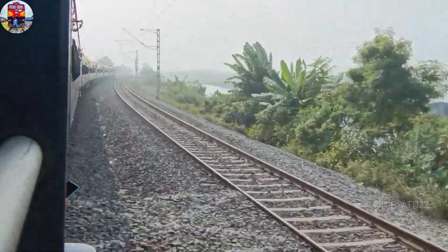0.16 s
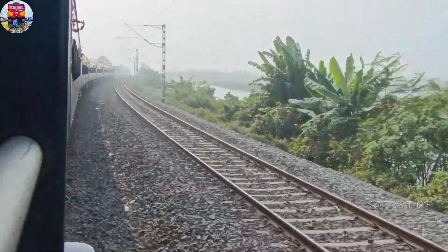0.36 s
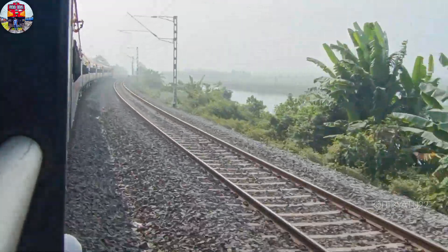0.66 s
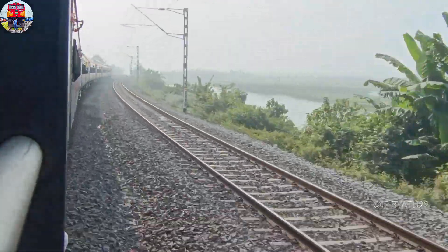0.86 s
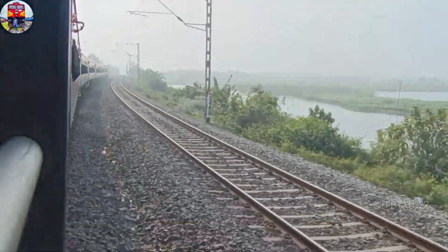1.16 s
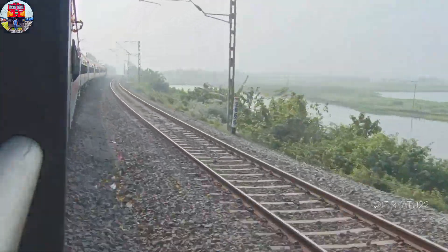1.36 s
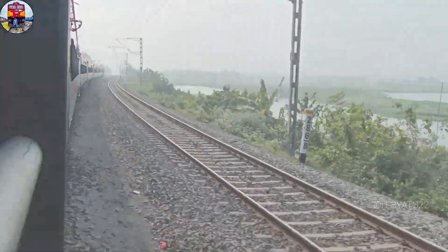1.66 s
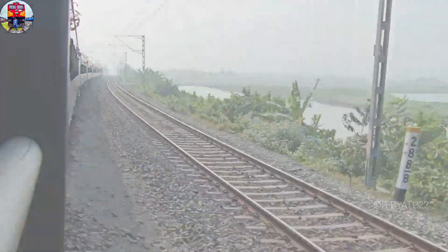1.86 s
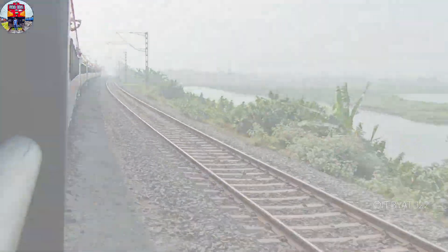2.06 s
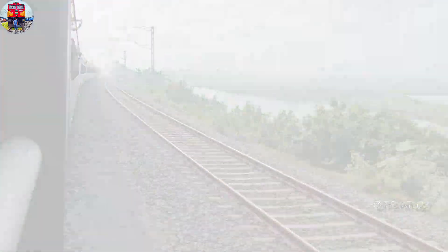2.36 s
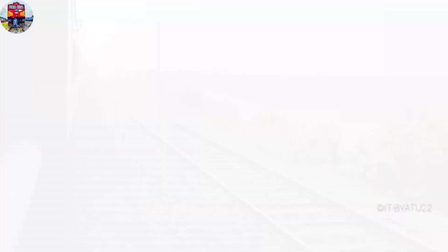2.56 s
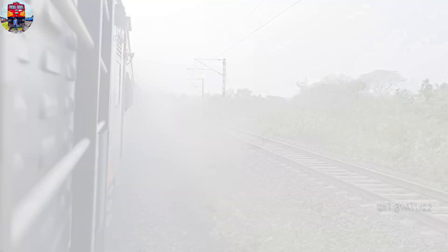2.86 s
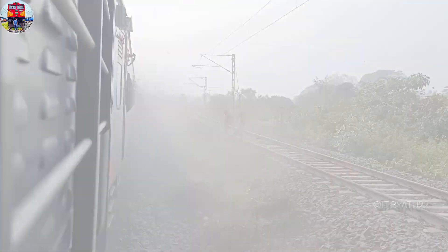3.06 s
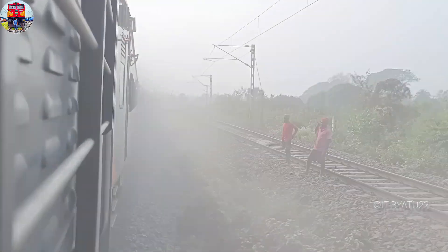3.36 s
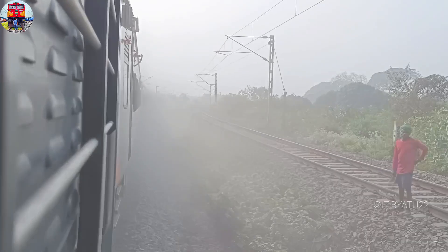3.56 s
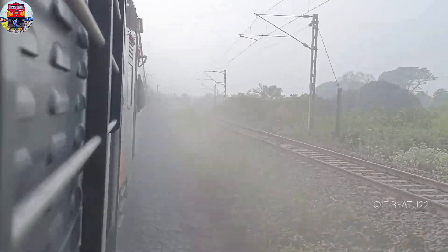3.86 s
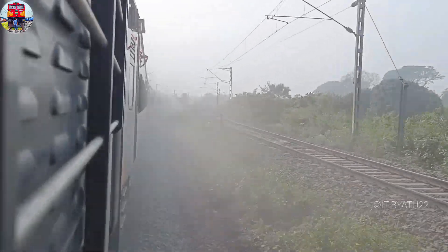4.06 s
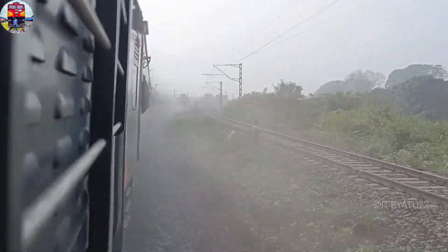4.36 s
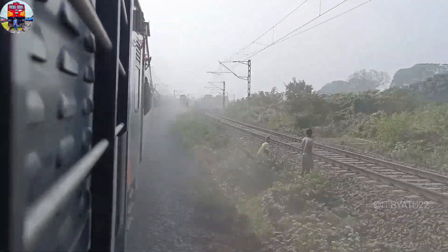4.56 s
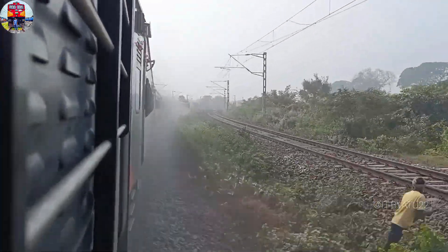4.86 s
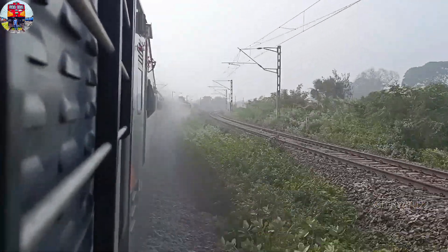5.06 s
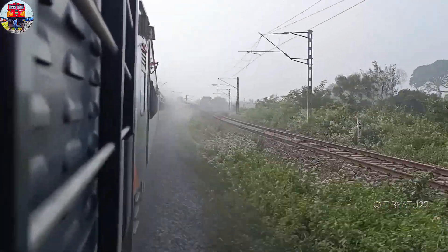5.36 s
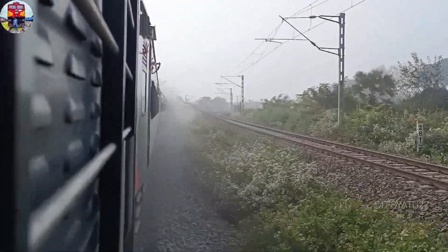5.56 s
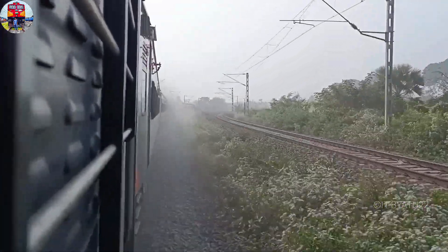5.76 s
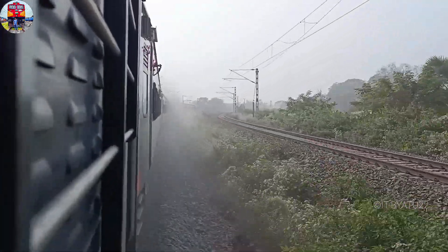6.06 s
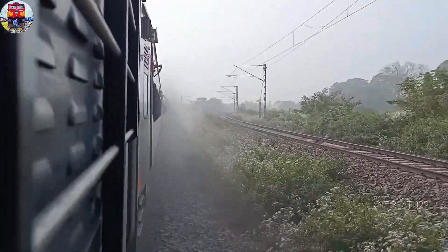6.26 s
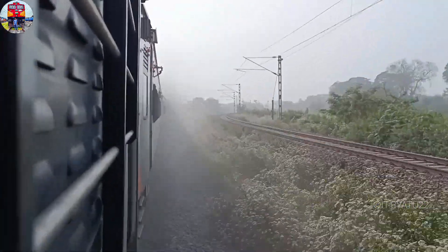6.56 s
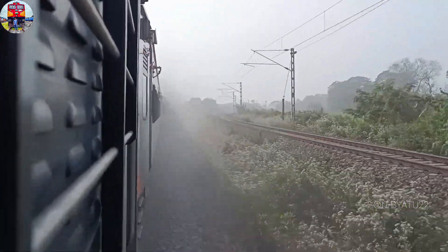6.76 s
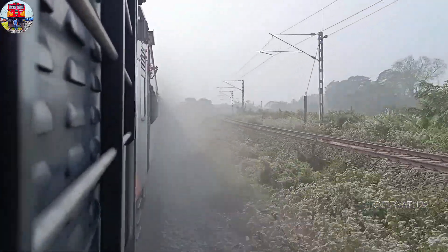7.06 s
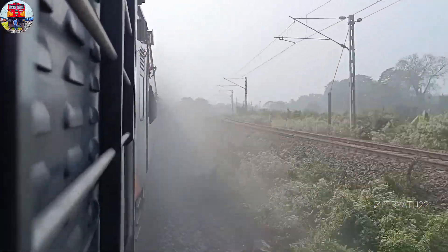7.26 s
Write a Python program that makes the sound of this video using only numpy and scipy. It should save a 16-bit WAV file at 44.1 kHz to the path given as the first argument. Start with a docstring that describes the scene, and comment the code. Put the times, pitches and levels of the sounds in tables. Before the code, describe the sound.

Harsh headwind batters a microphone at a speeding train's door over rolling roar and grit ticks, dipping to silence once between two passages.

```python
"""At the open door of a fast train, in two passages joined by a fade through silence.
Turbulent headwind buffets two microphone ports separately, as noise with gusts, lulls and hissing puffs.
Wheels and rails roar mostly into the sheltered left port, as patchy noise; in the second passage narrow
resonances ring and a throb follows the wheel turns. Grit ticks, as short noise bursts; the end of a horn
blast, a sum of overtones, opens the scene. The loud peaks clip."""
import sys
import numpy as np
from scipy import signal
from scipy.fft import rfft, irfft, next_fast_len
from scipy.io import wavfile
from scipy.ndimage import uniform_filter1d

SR = 44100
rng = np.random.default_rng(int(sys.argv[2]) if len(sys.argv) > 2 else 0)


def store_wav(level_fs):
    """Save 16-bit WAV to argv[1]."""
    pcm = np.round(np.clip(np.atleast_2d(level_fs), -1, 1) * 32767)
    wavfile.write(sys.argv[1], SR, pcm.T.astype(np.int16))


N = 326781
T = np.arange(N) / SR
JOIN_S = 2.633  # where the second passage follows the first


def gain_of(db):
    """Logarithmic level: decibels to an amplitude ratio."""
    return 10 ** (np.asarray(db) / 20)


def evened(x):
    """Normalisation of power: scales to rms 1."""
    return x / np.sqrt(np.mean(x ** 2) + 1e-20)


def read(points, x):
    """Logarithmic frequency scale: interpolates a table on a log axis."""
    hz, value = np.transpose(points)
    return np.interp(np.log(x + 1), np.log(hz + 1), value)


def colour(x, points):
    """Linear filtering: multiplies the spectrum by a table of gains in dB."""
    size = next_fast_len(len(x))
    gain = gain_of(read(points, np.fft.rfftfreq(size, 1 / SR)))
    return irfft(rfft(x, size) * gain, size)[:len(x)]


def wobble(hz):
    """Low-passed random process: smooth chance of rms 1 that changes about hz times a second."""
    width = max(int(SR / hz / 2), 1)
    smooth = uniform_filter1d(rng.standard_normal(N), width)
    return evened(uniform_filter1d(smooth, width))


def bumps(rows):
    """Superposition of level envelopes: flat-topped dB bumps, each centred on its time."""
    out = np.zeros(N)
    for s, db, length in rows:
        near = slice(max(int((s - length) * SR), 0), max(int((s + length) * SR), 0))
        out[near] += db * np.exp(-(2 * (T[near] - s) / length) ** 4)
    return out


def field(gain, patchy_db):
    """Short-time spectral synthesis: noise of spectrum gain(Hz) with drifting patches of level."""
    frames, hz = N // 256 + 5, np.fft.rfftfreq(1024, 1 / SR)
    real, imaginary, patches = rng.standard_normal((frames, 513, 3)).T
    patches = uniform_filter1d(patches, size=8, axis=0)  # over frequency
    patches = evened(uniform_filter1d(patches, size=10, axis=1))  # over time
    spectra = (real + 1j * imaginary) * gain(hz)[:, None] * gain_of(patchy_db * patches)
    return evened(signal.istft(spectra, nperseg=1024, noverlap=768)[1][:N])


# overtones of the horn: (multiple of the fundamental [1], rms level on the left [dB])
HORN_OVERTONES = [(3, -19), (6, -31), (7, -20), (8, -30), (9, -30), (10, -31), (11, -32)]
HORN_HZ, HORN_END_S = 237.3, 0.11


def horn():
    """Harmonic series: the last moment of a horn blast, slightly unsteady, stopping short."""
    turns = np.cumsum(HORN_HZ * (1 + 0.0054 * wobble(hz=30))) / SR
    tone = 0
    for multiple, db in HORN_OVERTONES:
        phase = 2 * np.pi * (multiple * turns + rng.random())
        tone = tone + gain_of(db) * np.sqrt(2) * np.sin(phase)
    stop = 1 + np.exp(np.clip((T - HORN_END_S) / 0.009, -50, 50))
    return tone / stop * gain_of([[0], [-14.]])  # left, right


# large ticks of grit thrown against the car:
# (time [s], level before the burst shape [dB], left minus right [dB])
LARGE_TICKS = [(0.0574, -14.5, 19), (0.857, -18, 8), (1.2256, -20, 10), (1.4678, -13.5, 12), (1.54, -19, 4),
               (1.585, -18, 9.5), (1.7154, -23, 14), (1.8244, -22, 14.0), (1.961, -15, 8),
               (3.5014, -29, 1.5), (3.5917, -28, 1.0), (3.669, -20, 2), (4.19, -19, 3), (5.2305, -23, -12),
               (5.391, -21, 6), (5.68, -21, -4), (5.882, -23, -14)]
# colour of a tick: (frequency [Hz], relative level per Hz [dB])
TICK_COLOUR = [(800, -11), (2500, 0.5), (6000, -3.5), (10000, -20.5), (16000, -34)]
GRIT_PER_S, GRIT_LEAST_DB = 25, -42  # the many small ticks: mean rate, lowest level before panning


def grit():
    """Impact noise: millisecond bursts of bright noise, large ticks and small ones at random."""
    size_db = GRIT_LEAST_DB + 4 * np.minimum(rng.exponential(1, N), 3)
    size = gain_of(size_db) * (rng.random(N) < GRIT_PER_S / SR)
    halves = np.array([.5, -.5])  # a level difference splits evenly between the ports
    hits = size * gain_of(12.0 * rng.standard_normal(N) * halves[:, None])
    for s, db, pan_db in LARGE_TICKS:
        hits[:, round(s * SR)] += gain_of(db + halves * pan_db)
    t = np.arange(SR // 40) / SR
    snap = np.exp(-t / 0.0015) - np.exp(-t / 0.00017)
    rattle = 0.091 * np.exp(-t / .006)
    shape = signal.oaconvolve(hits, (snap + rattle)[None])[:, :N]
    return shape * [evened(colour(rng.standard_normal(N), TICK_COLOUR)) for port in hits]


WHEEL_TURNS_PER_S, WHEEL_TOP_S = 10.22, 5.234  # wheel turns, and a moment when the throb peaks


def throb(depth_db):
    """Periodic load modulation: a wheel not quite round loads the rail more once per turn."""
    return gain_of(depth_db * np.cos(2 * np.pi * WHEEL_TURNS_PER_S * (T - WHEEL_TOP_S)))


# resonances of wheel and rail: (frequency [Hz], width [Hz], relative share of power [dB])
RESONANCES = [(287, 14, -15), (755, 14, -21), (895, 25, -19), (935, 16, -18), (1489, 16, -24),
              (1735, 60, -15), (1790, 34, -10.5), (1850, 60, -18), (2337, 18, -20)]


def rings():
    """Resonance: noise in the narrow modes of wheel and rail, wavering in strength."""
    size = next_fast_len(N)
    hz = np.fft.rfftfreq(size, 1 / SR)
    power = np.zeros(len(hz))
    for f, width, db in RESONANCES:
        power += gain_of(2 * db) / width / (1 + (2 * (hz - f) / width) ** 2) ** 2
    ringing = irfft(rfft(rng.standard_normal(size)) * np.sqrt(power), size)[:N]
    return evened(ringing) * gain_of(1.6 * wobble(hz=25))


# rolling roar in the first and second passage: (frequency [Hz], relative level per Hz [dB])
FIRST_ROAR = [(60, -43), (150, -1.5), (300, 0), (850, 0.5), (1400, -6.5), (1950, 3), (2300, -1.5),
              (2850, -6.5), (4200, -11.5), (5600, -21), (7000, -33.5), (10000, -50), (16000, -64)]
SECOND_ROAR = [(60, -38.5), (150, 2), (300, -6), (550, -0.5), (920, 4.5), (1350, -7.5), (1900, 1.5),
               (2950, 0), (3800, -14), (6500, -30), (9000, -34.5), (11000, -53), (16000, -53)]
RING_THROB_DB, ROAR_THROB_DB = 3.5, 0.56  # depth of the throb, up and down


def roar():
    """Broadband contact noise: plain roar before the join, throbbing and ringing roar after it."""
    first = field(lambda hz: gain_of(read(FIRST_ROAR, hz)), patchy_db=1.5)
    second = field(lambda hz: gain_of(read(SECOND_ROAR, hz)), patchy_db=1.05)
    ringing = gain_of(-6.0) * rings() * throb(RING_THROB_DB)
    return np.where(T < JOIN_S, first, second * throb(ROAR_THROB_DB) + ringing)


# roar swelling about once a second with track and surroundings: (time [s], level [dB])
ROLLING_LEVEL = [(0.0, -7.5), (0.16, -13.5), (0.19, -20.5), (0.3, -14.5), (0.4, -13.5), (0.47, -9),
                 (0.78, -7.5), (0.9, -16.5), (1.08, -11), (1.17, -8.5), (1.3, -16.5), (1.62, -7),
                 (1.8, -8.5), (1.9, -10.5), (2.25, -13), (2.52, -11), (2.755, -17), (2.775, -12.5),
                 (2.88, -14.5), (3.05, -12.5), (3.42, -20.5), (3.7, -14), (4.16, -9.5), (4.23, -13.5),
                 (4.41, -21.5), (4.6, -16.5), (4.77, -19.5), (5.04, -13.5), (5.13, -17.5), (5.31, -13),
                 (5.4, -18.5), (6.03, -12), (6.42, -10.5), (6.55, -12), (6.61, -20), (6.68, -17.5),
                 (6.75, -16), (6.9, -16), (7.15, -10), (7.31, -7.5), (7.35, -15.5), (7.41, -14)]
# how much of the roar reaches the right port: (frequency [Hz], gain [dB])
RIGHT_SHADE = [(200, -3), (900, -11), (2000, -23.5), (4000, -21), (6500, -14), (8500, -6.5), (12000, -14)]
LEFT_LAG = 9  # samples by which the roar is late on the left


def rolling():
    """Shadowing and partial coherence: the right port gets a shaded, partly unrelated roar earlier."""
    level = gain_of(np.interp(T, *np.transpose(ROLLING_LEVEL)) + 1.07 * wobble(hz=24.2))
    direct, scattered = roar(), roar()
    right = colour(0.34 * direct + 1.2 * scattered, RIGHT_SHADE)
    return level * np.array([np.roll(direct, LEFT_LAG), right])


# wind on a port: (frequency [Hz], relative level per Hz [dB])
WIND_COLOUR = [(40, -39), (70, -27.5), (120, -8), (190, 0.5), (320, -0.5), (600, -6.5), (1200, -17.5),
               (2500, -28.5), (5000, -45), (9000, -62.5), (16000, -87)]


def wind(strength_db, puffs_db):
    """Turbulence: stronger wind makes smaller eddies, so the top grows faster than the thud."""
    eddies = evened(colour(rng.standard_normal(N), WIND_COLOUR))
    thud = signal.sosfiltfilt(signal.butter(1, 700., fs=SR, output="sos"), eddies)
    top = eddies - thud
    top_db = 1.463 * strength_db + 5.0 + 3.58 * wobble(hz=90) + puffs_db
    return gain_of(strength_db) * thud + gain_of(top_db) * top


# strong gusts that reach the sheltered left port: (time [s], rise of strength [dB], length [s])
LEFT_GUSTS = [(0.096, 12, 0.24), (0.583, 8, 0.3), (0.858, 16.5, 0.07), (0.986, 17, 0.027),
              (1.205, 10.5, 0.21), (1.744, 13.5, 0.23), (1.94, 14, 0.089), (2.127, 16, 0.045),
              (2.379, 13, 0.042), (2.53, 14, 0.12), (2.694, 18, 0.05), (2.961, 9.5, 0.14),
              (3.085, 16.5, 0.075), (3.281, 15, 0.061), (3.356, 17, 0.031), (3.388, 11.5, 0.032),
              (3.624, 14, 0.031), (3.72, 18.5, 0.045), (3.991, 7.5, 0.2), (4.194, 18, 0.024),
              (4.326, 19.5, 0.02), (4.43, 9.5, 0.068), (4.677, 17, 0.08), (4.801, 17, 0.019),
              (4.977, 9, 0.11), (5.136, 12.5, 0.14), (5.34, 16, 0.043), (5.506, 18.5, 0.037),
              (5.591, 12, 0.051), (5.735, 14, 0.048), (5.827, 13, 0.039), (6.002, 14, 0.028),
              (6.09, 12.5, 0.04), (6.23, 14.5, 0.083), (6.42, 11.5, 0.13), (6.57, 17.5, 0.085),
              (6.649, 15, 0.031), (6.741, 18, 0.042), (6.856, 11.5, 0.11), (7.06, 13, 0.021),
              (7.299, 12.5, 0.11)]
# deep, short lulls on the exposed right port: (time [s], drop of strength [dB], length [s])
RIGHT_LULLS = [(0.33, 2.5, 0.24), (0.44, 15, 0.048), (0.615, 9, 0.058), (0.758, 18, 0.056),
               (1.02, 13, 0.052), (1.31, 7, 0.12), (1.429, 8, 0.065), (1.987, 19, 0.051), (2.079, 4, 0.027),
               (2.303, 15, 0.033), (2.45, 9, 0.026), (2.494, 9, 0.022), (2.798, 11, 0.032),
               (2.854, 19, 0.02), (3.189, 16, 0.035), (3.241, 8, 0.025), (3.664, 16, 0.022),
               (4.027, 8, 0.02), (4.143, 6, 0.11), (4.265, 12, 0.037), (4.486, 3.5, 0.092),
               (4.546, 19, 0.025), (5.037, 11, 0.017), (5.68, 2.5, 0.02), (5.767, 11, 0.036),
               (5.919, 14, 0.042), (6.142, 23, 0.027), (6.306, 16, 0.044), (6.465, 5, 0.033),
               (6.965, 11, 0.033), (7.1, 13, 0.066), (7.252, 15, 0.018), (7.359, 13, 0.015)]
# sharp, hissing puffs: (time [s], port [0 left, 1 right], rise of the top [dB])
HISSING_PUFFS = [(0.159, 1, 12.5), (0.157, 0, 15), (0.483, 1, 11), (0.554, 0, 16), (0.689, 1, 10),
                 (0.792, 1, 16), (1.066, 1, 13.5), (1.195, 0, 15), (2.031, 1, 11), (2.12, 0, 10),
                 (2.375, 0, 15), (2.371, 1, 5), (2.682, 1, 15.5), (2.878, 1, 11.5), (3.255, 1, 8),
                 (3.354, 1, 12.5), (4.312, 1, 13.5), (4.405, 1, 6.5), (4.423, 0, 16), (4.637, 1, 11),
                 (4.8, 1, 13.5), (4.97, 1, 6), (5.11, 0, 7.5), (5.576, 1, 8), (5.711, 1, 12),
                 (5.945, 1, 7.5), (6.007, 1, 8), (7.17, 1, 13.5), (7.3, 0, 7), (7.302, 1, 5)]
# each pair is left, right
WIND_DB = (-22.5, -9)  # strength between gusts on the left, between lulls on the right
FLUTTER_DB, SWAY_DB = (1, 2.5), (0.7, 1.05)  # rms of the fast and slow chance in strength
PUFF_S = (0.027, 0.014)  # length of a puff


def headwind():
    """Uncorrelated pressure fluctuations: separate wind per port, lesser gusts and lulls by chance."""
    swings = [bumps(LEFT_GUSTS), -bumps(RIGHT_LULLS)]
    ports = []
    for port in (0, 1):
        puffs_db = bumps([(s, db, PUFF_S[port]) for s, at, db in HISSING_PUFFS if round(at) == port])
        chance_db = FLUTTER_DB[port] * wobble(hz=33.8) + SWAY_DB[port] * wobble(hz=16.4)
        ports.append(wind(WIND_DB[port] + chance_db + swings[port], puffs_db))
    return np.array(ports)


def scene():
    """Superposition: horn, grit and rolling train under the headwind."""
    return horn() + grit() + rolling() + headwind()


FADE_OUT_S, FADE_IN_S = 2.75, 2.45


def fade():
    """Linear gain ramps: straight fade out to the join and straight fade in after it."""
    ramp = np.where(T < JOIN_S, (JOIN_S - T) / FADE_OUT_S, (T - JOIN_S) / FADE_IN_S)
    return np.minimum(ramp, 1)


FIRST_EDGE_HZ, EDGE_HZ = 15800, 21800  # band limits before and after the hard clip


def record(dry):
    """Saturation and band-limiting: soft overload, low cut, band limit, fades, hard clip, band limit."""
    def low_pass(x, hz):
        """Linear-phase filtering: removes what lies above hz."""
        taps = signal.firwin(255, hz, window=("kaiser", 9), fs=SR)
        return signal.oaconvolve(x, taps[None], "same")
    ceiling = 2.84  # amplitude that the soft overload approaches
    overloaded = ceiling * np.tanh(dry / ceiling)
    low_cut = signal.butter(3, 65., "high", fs=SR, output="sos")
    captured = low_pass(signal.sosfilt(low_cut, overloaded), FIRST_EDGE_HZ)
    return low_pass(np.clip(captured * fade(), -1, 1), EDGE_HZ)


dry = scene()
out = record(dry)
store_wav(out)
```